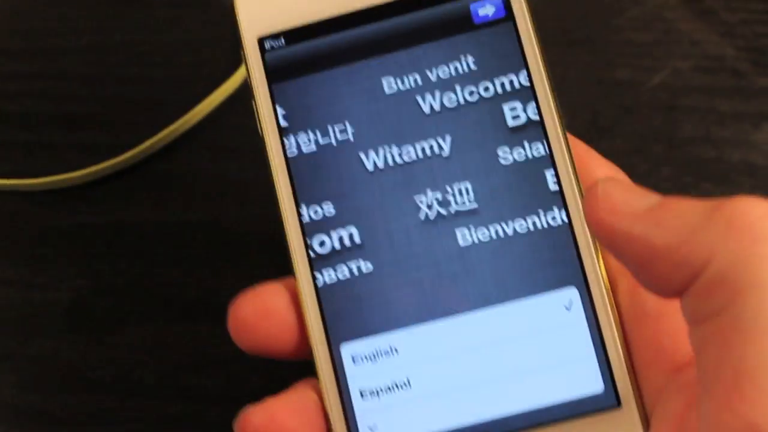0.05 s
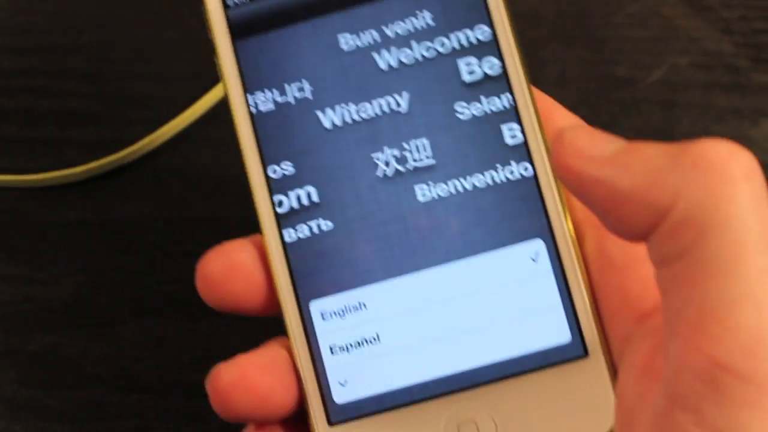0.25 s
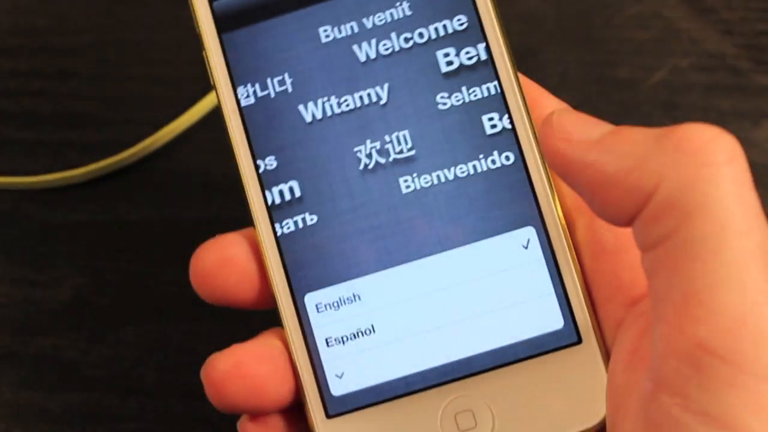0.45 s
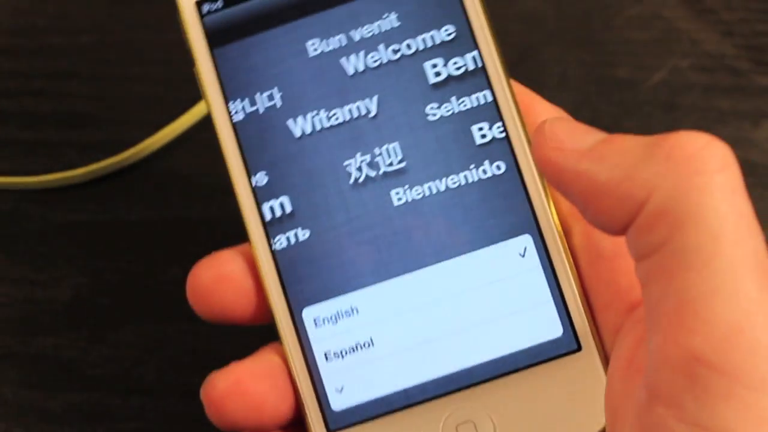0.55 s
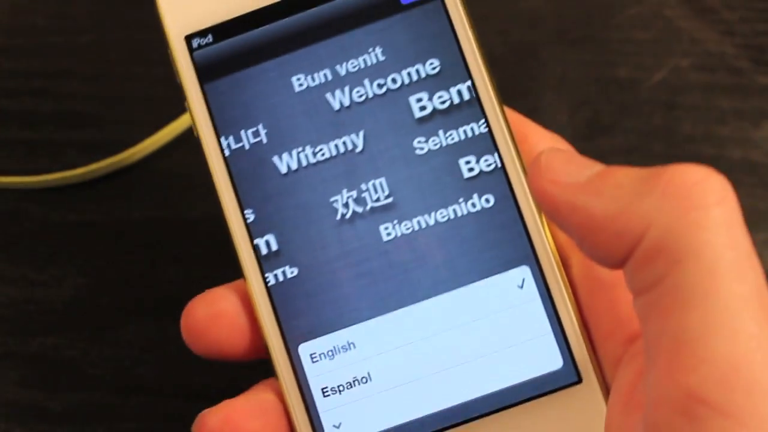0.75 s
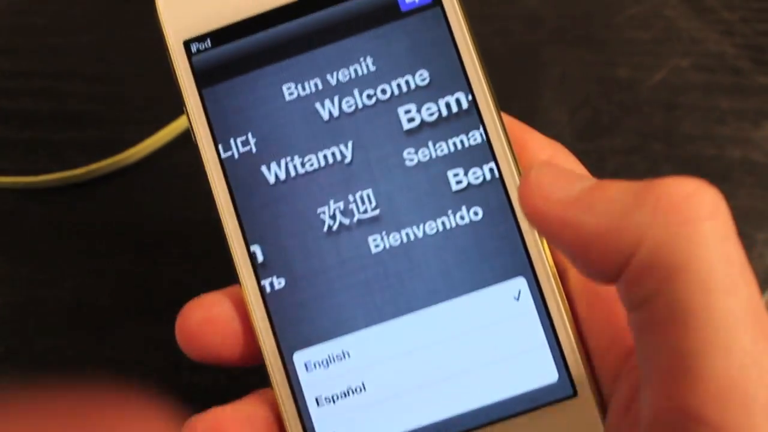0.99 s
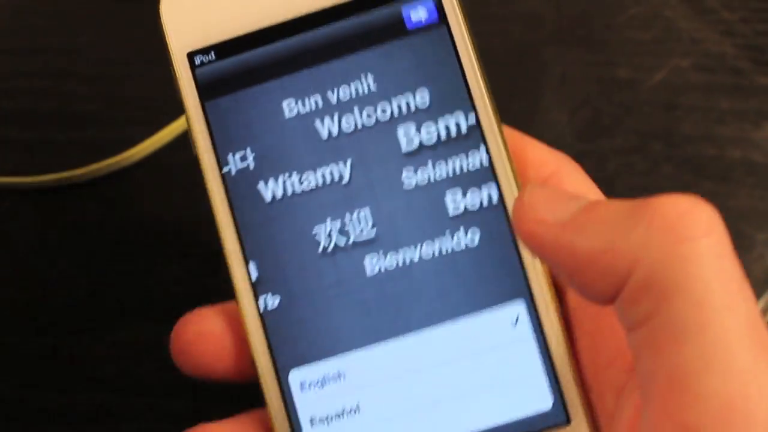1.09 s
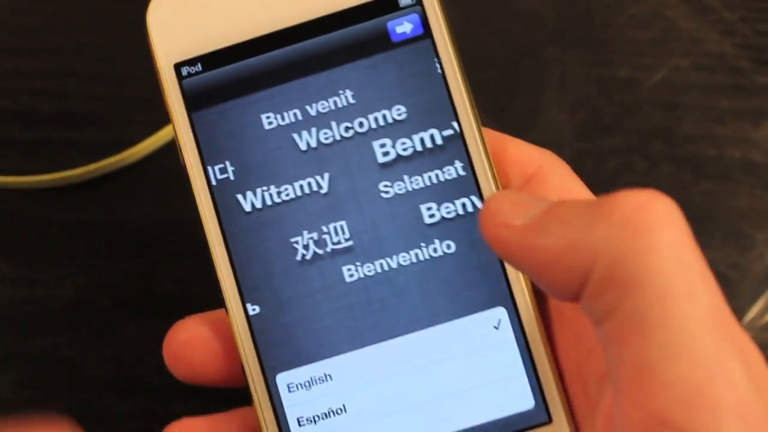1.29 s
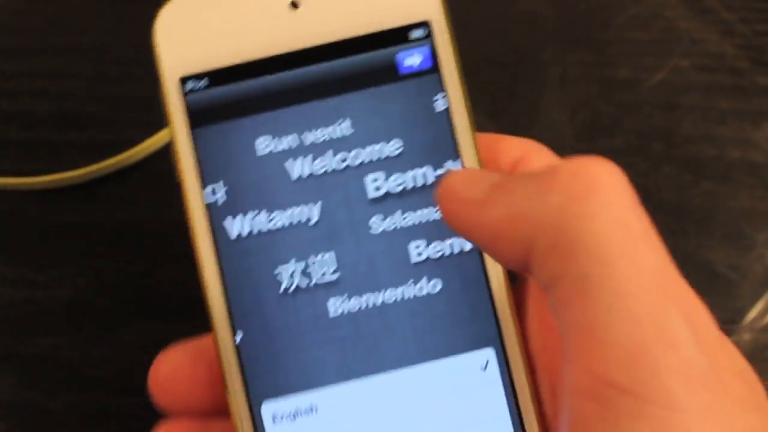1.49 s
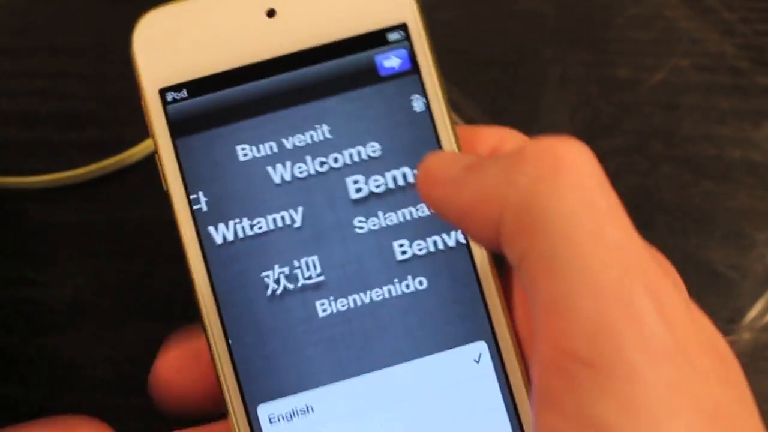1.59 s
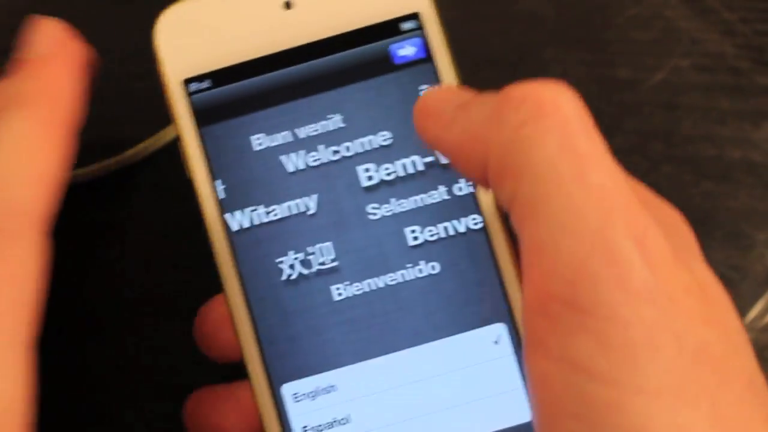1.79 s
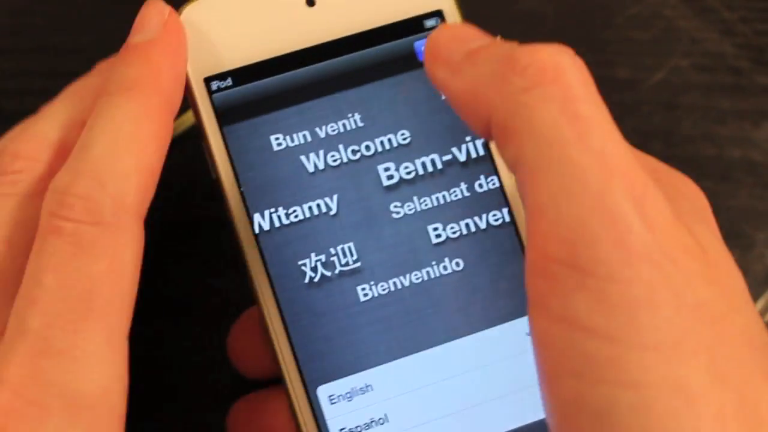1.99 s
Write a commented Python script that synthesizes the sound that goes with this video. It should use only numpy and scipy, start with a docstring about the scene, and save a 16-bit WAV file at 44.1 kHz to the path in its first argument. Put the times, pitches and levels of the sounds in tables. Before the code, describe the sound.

A sharp button click on a handheld device, then faint ticks and finger taps.

```python
"""Handling a small touchscreen player

Fingers shift and rub on the case in a quiet room. A button snaps down and up with a short ring,
then the case ticks, takes a few soft finger taps, and a thumb brushes the glass.
The desk reflects each of these sounds; a small motor hums low under an even hiss."""
import sys
import numpy as np
from scipy import signal
from scipy.fft import rfft, irfft
from scipy.io import wavfile
from scipy.ndimage import uniform_filter1d

SR = 44100
rng = np.random.default_rng(int(sys.argv[2]) if len(sys.argv) > 2 else 0)


def dump(signal):
    """Clip the signal to [-1, 1] and save it as 16-bit WAV at the path in sys.argv[1]."""
    limited = np.clip(np.atleast_2d(signal).T, -1, 1)
    pcm = np.round(limited * 32767).astype(np.int16)
    wavfile.write(sys.argv[1], SR, pcm)


N = 90404

# The button's tones. Each row: pitch in Hz, seconds to fade by 60 dB, dB on press, dB on release.
BUTTON_TONES = [(1074, 0.022, -22, -24.5), (1310, 0.027, -9.5, -9), (1564, .016, -10.5, -18),
                (1680, 0.02, -14, -18.5), (2320, 0.019, -11.5, -19.5), (2460, .014, -37, -22.5),
                (3162, 0.022, -9.5, -23), (3950, 0.01, -15, -27), (4334, 0.013, -18.5, -67),
                (6500, 0.019, -38, -45), (7960, .012, -37.5, -60), (10951, 0.015, -40.5, -58)]
# The press, then the release. Each row: start in seconds, ring level in dB, crack level in dB,
# bounce in dB compared with the ring, share of the full ring time.
BUTTON_STROKES = [(.2150, -2.5, -16, -13, 1.0), (.2331, 0, -25.5, -12, 0.69)]
def button():
    """The button snaps down, then back up against the finger, which damps it; each stroke bounces once."""
    out = np.zeros(N)
    bounce_delay_s = 0.001122
    for k, (start, db, crack_db, bounce_db, share) in enumerate(BUTTON_STROKES):
        tones = [(hz, fade_s * share, levels[k]) for hz, fade_s, *levels in BUTTON_TONES]
        stroke = gain(db) * ring(tones)
        bounce = cut(stroke, 4000, "low", order=1)
        crack = cut(burst(decay_s=0.0031), 5100, "low", order=1)
        add(out, start, stroke)
        add(out, start + bounce_delay_s, gain(bounce_db) * bounce)
        add(out, start, gain(crack_db) * crack)
    return cut(cut(out, 1315, "high", order=3), 11900, "low")


# The tones of the held case. Each row: pitch in Hz, seconds to fade by 60 dB, relative level in dB.
CASE_TONES = [(320, 0.033, -5), (434, 0.078, -1.5), (657, 0.052, 5.5), (910, 0.032, -4.5), (1127, .025, 7),
              (1320, 0.033, 3), (1580, 0.016, 5), (2040, 0.016, -0.5)]
# Finger taps. Each row: start in seconds, level in dB, scuff fade in seconds, treble cutoff in Hz.
FINGER_TAPS = [(.1183, -15, 0.0018, 2020), (0.1237, -18.5, 0.0044, 1190), (0.143, -19, .004, 1310),
               (0.1467, -14.5, 0.0033, 1900), (0.155, -18.5, 0.012, 1510), (0.21, -20.5, 0.0018, 2600),
               (.574, -34, 0.0069, 2200), (0.855, -37, .005, 1600), (1.3185, -37, .005, 1400),
               (1.3968, -29, 0.0036, 1150), (1.438, -44, .005, 1300), (1.586, -31, .004, 1200)]
def taps():
    """Fingertips land with a push and a little scuff, and the case rings; softer flesh sounds duller."""
    out = np.zeros(N)
    body = ring(CASE_TONES)
    body /= np.linalg.norm(body)
    for start, db, fade_s, top_hz in FINGER_TAPS:
        scuff = burst(fade_s, size=len(body))
        scuffed_body = signal.fftconvolve(scuff, body)[:len(body)]
        tap = body + gain(-4) * scuffed_body + gain(-24) * scuff
        add(out, start, gain(db) * cut(tap, top_hz, "low", order=3))
    return out


# The tone colours of a tick's body and bright edge. Each row: frequency in Hz, relative level in dB.
BODY_COLOUR = [(300, -7), (950, -23), (1450, 3.5), (1800, -1.5), (2200, 6), (2950, 3.5), (3450, -5.5),
               (4300, -9), (5500, -15), (16000, -64.5)]
EDGE_COLOUR = [(500, -2.5), (3000, 1.5), (5000, -1), (6200, -1), (7500, 0), (9000, -4), (10800, -16.5),
               (13000, -11), (15000, -11), (17000, -30)]
# Ticks of the case. Each row: start in seconds, body level in dB, edge level in dB.
CASE_TICKS = [(0.1407, -48, -25.5), (0.1464, -51, -23), (.1517, -41, -30), (.9897, -29.5, -50),
              (1.0083, -22.5, -28.5), (1.0216, -24, -26), (1.0524, -21.5, -37), (1.0603, -33, -39),
              (1.5861, -28, -37)]
def ticks():
    """The case slips under the grip: short dry ticks, some with a bright edge."""
    out = np.zeros(N)
    body, edge = click(BODY_COLOUR), click(EDGE_COLOUR)
    for start, body_db, edge_db in CASE_TICKS:
        add(out, start, gain(body_db) * body + gain(edge_db) * edge)
    return out


# The tone colour of rubbing skin. Each row: frequency in Hz, relative level in dB.
RUB_COLOUR = [(300, -31.5), (750, -9), (1100, -2), (1450, 2.5), (1800, -4.5), (2300, -1), (3300, -9),
              (5500, -11), (7600, -10.5), (9500, -23.5), (14500, -15), (17000, -21)]
# Rubs. Each row: start in seconds, length in seconds, level in dB, tilt in dB per octave (lower is duller).
SKIN_RUBS = [(0.098, 0.019, -54, -5.5), (0.133, 0.01, -53.5, -3.5), (0.1847, 0.02, -37.5, -1),
             (0.2084, 0.0052, -39.5, -6.5), (0.559, 0.026, -62.5, -7), (1.32, 0.0083, -58, -0.5),
             (1.397, 0.0056, -54, -3), (1.433, 0.0078, -54, -3), (1.591, 0.032, -63, -0.5)]
def rubs():
    """Skin slides briefly over the case, making dense, uneven grains of noise."""
    out, t = np.zeros(N), np.arange(4096) / SR
    rise_s, fall_s = 0.0036, 0.00098
    for start, length, db, tilt_db in SKIN_RUBS:
        noise, unevenness = rng.standard_normal((2, len(t)))
        grains = colour(noise * gain(-1.5 * unevenness), RUB_COLOUR, tilt_db)
        fade_in = np.clip(t / rise_s, 0, 1)
        fade_out = np.clip((length - t) / fall_s + 0.5, 0, 1)
        add(out, start, gain(db) * fade_in * fade_out * grains)
    return out


# The tone colour of a thumb on glass. Each row: frequency in Hz, relative level in dB.
BRUSH_COLOUR = [(400, -2), (1800, -18), (2500, 2.5), (3500, 1.5), (4500, 0.5), (5500, -6), (8000, -12),
                (10500, -15), (15000, -14), (17000, -25)]
# Thumb strokes. Each row: start in seconds, level in dB, swell in seconds, fade in seconds.
THUMB_STROKES = [(1.5842, -44, 0.0016, 0.0042), (1.654, -57.5, 0.014, 0.011)]
def brushes():
    """The thumb brushes the glass: light, bright noise that swells and fades."""
    out, t = np.zeros(N), np.arange(N) / SR
    for start, db, swell_s, fade_s in THUMB_STROKES:
        swell = np.minimum(t / swell_s, 1)
        fade = np.exp(-np.maximum(t - swell_s, 0) / fade_s)
        add(out, start, gain(db) * swell * fade * colour(rng.standard_normal(N), BRUSH_COLOUR))
    return out


# Dull bumps. Each row: start in seconds, level in dB, length in seconds, middle frequency in Hz.
PALM_BUMPS = [(.112, -49.5, 0.047, 230), (0.115, -45, 0.011, 660), (0.733, -49, 0.065, 216),
              (1.395, -48, 0.014, 680), (1.408, -55, 0.056, 513), (1.441, -50, 0.015, 262)]
def bumps():
    """The palm shifts against the case: soft swells of low noise."""
    out, t = np.zeros(N), np.arange(8192) / SR
    band_ratio = 1.17
    for start, db, length, hz in PALM_BUMPS:
        noise = cut(rng.standard_normal(len(t)), hz / band_ratio, "high")
        band = unit(cut(noise, hz * band_ratio, "low", order=4))
        swell = np.sin(np.pi * np.minimum(t / length, 1))
        add(out, start, gain(db) * swell * band)
    return out


# Echoes off the desk. Each row: delay in seconds, level in dB.
DESK_ECHOES = [(.0014, -26), (.0027, -17), (.0049, -23)]
def room(x):
    """The sound bounces off the desk, and the room adds a faint, short, dull tail."""
    tail_s = 0.081  # time to fade by 60 dB
    tail = cut(burst(tail_s / np.log(1000), size=16384), 3500, "low")
    out = x + gain(-15.5) * signal.fftconvolve(x, tail)[:N]
    for delay, db in DESK_ECHOES:
        add(out, delay, gain(db) * cut(x, 4500, "low", order=1))
    return out


# The motor's tones. Each row: pitch in Hz, level in dB at the start, level in dB at the end.
MOTOR_TONES = [(48.4, -76, -67), (73.3, -63.5, -64.5), (97.7, -72, -69), (117.1, -62, -61.5),
               (166, -53.5, -70.5), (212.7, -61.5, -67), (272.1, -67, -64), (320, -66, -64),
               (352.6, -58, -63), (397.6, -66, -60.5), (520, -86, -73)]
def motor_hum():
    """A small motor hums; each of its tones wavers in pitch and loudness."""
    out = np.zeros(N)
    drift_hz, waver_db, wavers_per_s = 1.155, 3, 3.776
    for hz, start_db, end_db in MOTOR_TONES:
        cycles = np.cumsum(hz + drift_hz * wander(wavers_per_s)) / SR + rng.random()
        level_db = np.linspace(start_db, end_db, N) + waver_db * wander(wavers_per_s)
        out += np.sqrt(2) * gain(level_db) * np.sin(2 * np.pi * cycles)
    return out


# The tone colours of the rumble and the hiss. Each row: frequency in Hz, relative level in dB.
RUMBLE_COLOUR = [(20, -26), (38, -14), (65, -5.5), (140, -0.5), (190, -7.5), (300, -3.5), (385, -0.5),
                 (440, -15.5), (700, -19.5), (2000, -49)]
HISS_COLOUR = [(260, -11.5), (450, -3.5), (550, -6.5), (700, -6.5), (900, -8), (1200, -10), (1700, -10.5),
               (2400, -13), (4500, -16), (8500, -20.5), (10000, -25), (16000, -26)]
def rumble_and_hiss():
    """A low room rumble slowly eases under an even microphone hiss."""
    rumble = gain(np.linspace(-52.5, -57.5, N)) * colour(rng.standard_normal(N), RUMBLE_COLOUR)
    hiss = cut(colour(rng.standard_normal(N), HISS_COLOUR), 180, "high")
    return rumble + gain(-62) * hiss


def gain(db):
    """Turn decibels into a number to multiply by."""
    return 10 ** (np.asarray(db) / 20)


def unit(x):
    """Scale x to an average (rms) level of 1."""
    return x / np.sqrt(np.mean(x ** 2))


def add(out, start, x):
    """Mix x into out, beginning at start seconds."""
    i = max(int(round(start * SR)), 0)
    out[i:i + len(x)] += x[:max(len(out) - i, 0)]


def cut(x, hz, keep, order=2):
    """Keep the "low" or the "high" side of hz; a higher order cuts more steeply."""
    return signal.sosfilt(signal.butter(order, hz, keep, fs=SR, output="sos"), x)


def gain_curve(points, size, tilt_db=0):
    """Join (Hz, dB) points into a gain for every frequency, tilted by tilt_db per octave."""
    hz, db = np.array(points).T
    octave = np.log2(np.maximum(np.fft.rfftfreq(size, 1 / SR), 1))
    return gain(np.interp(octave, np.log2(hz), db + tilt_db * np.log2(hz / hz[0])))


def colour(x, points, tilt_db=0):
    """Give x a tone colour and an average level of 1."""
    return unit(irfft(rfft(x) * gain_curve(points, len(x), tilt_db), len(x)))


def click(points, size=1024):
    """A sharp click with the given tone colour and a total energy of 1."""
    cepstrum = irfft(np.log(gain_curve(points, size)))
    # Folding the second half onto the first packs the energy at the start of the click.
    cepstrum[1:size // 2] *= 2
    cepstrum[size // 2 + 1:] = 0
    pulse = irfft(np.exp(rfft(cepstrum)))
    return pulse / np.linalg.norm(pulse)


def ring(tones, size=4096):
    """Add up fading pure tones; neighbours swing in opposite directions."""
    out, t = np.zeros(size), np.arange(size) / SR
    for k, (hz, fade_s, db) in enumerate(tones):
        fade = np.exp(-np.log(1000) * t / fade_s)
        out += (-1) ** k * gain(db) * fade * np.sin(2 * np.pi * hz * t)
    return out


def wander(per_second):
    """A smooth random drift with a typical size of 1."""
    hold = int(SR / per_second)
    steps = np.repeat(rng.standard_normal(N // hold + 1), hold)
    return unit(uniform_filter1d(uniform_filter1d(steps, hold), hold)[:N])


def burst(decay_s, size=2048):
    """A fading puff of noise with a total energy of 1."""
    x = rng.standard_normal(size) * np.exp(-np.arange(size) / SR / decay_s)
    return x / np.linalg.norm(x)


def scene():
    """Handling sounds in the room, over hum, rumble and hiss, in one channel."""
    handling = button() + ticks() + taps() + rubs() + brushes() + bumps()
    return (room(handling) + motor_hum() + rumble_and_hiss())[None]


def record(dry):
    """Cut away the deepest bass and the highest treble."""
    bottom_hz, top_hz = 35, 15850
    treble_cut = signal.ellip(8, 0.1, 70, top_hz, fs=SR, output="sos")
    return signal.sosfilt(treble_cut, cut(dry, bottom_hz, "high", order=3))


dry = scene()
out = record(dry)
dump(out)
```